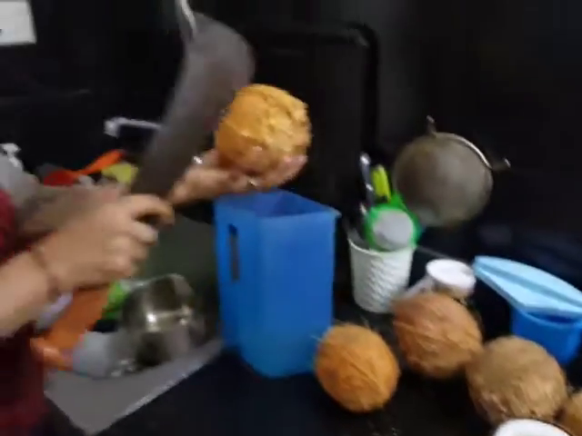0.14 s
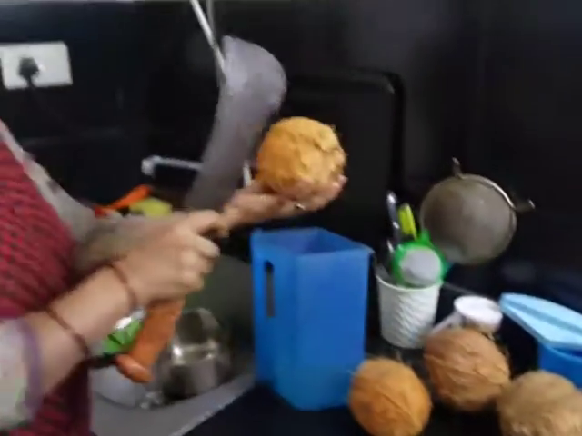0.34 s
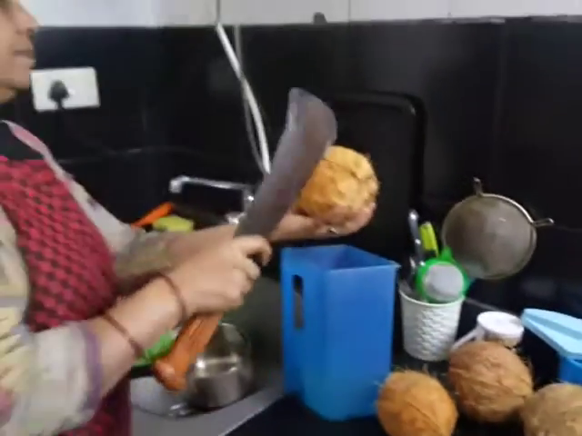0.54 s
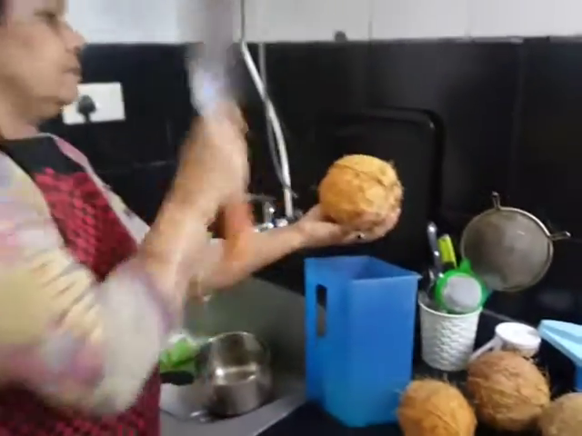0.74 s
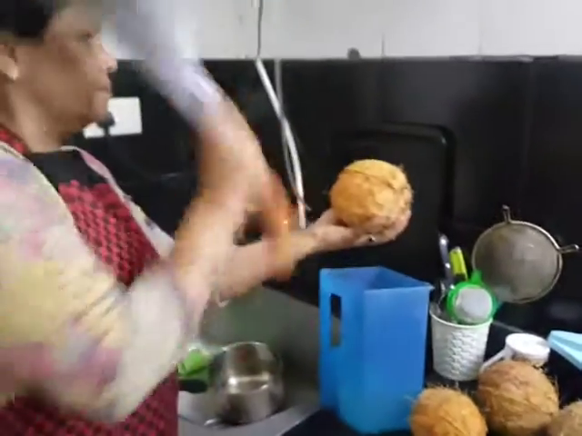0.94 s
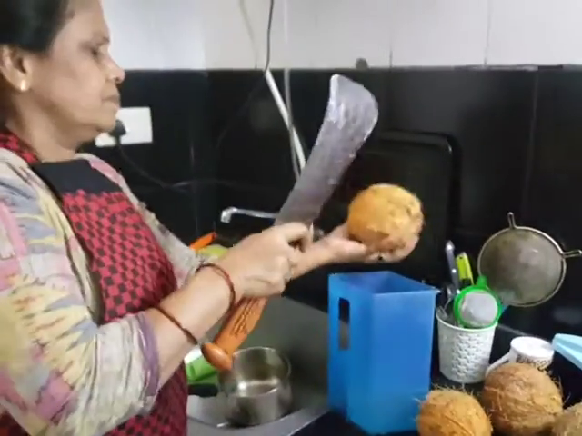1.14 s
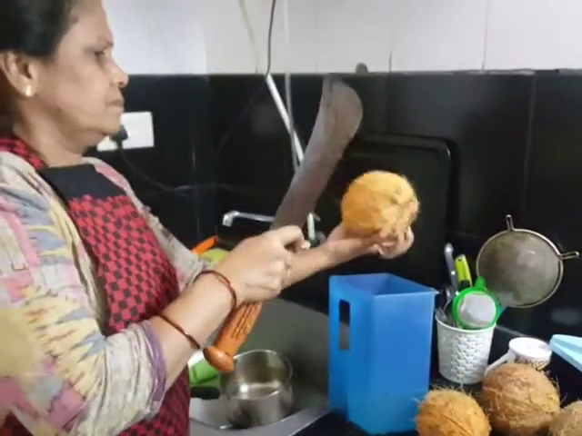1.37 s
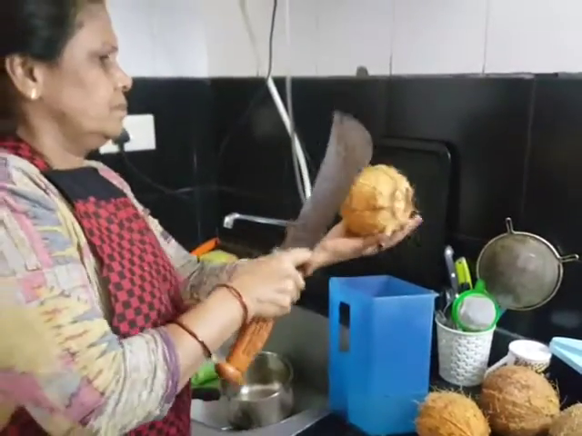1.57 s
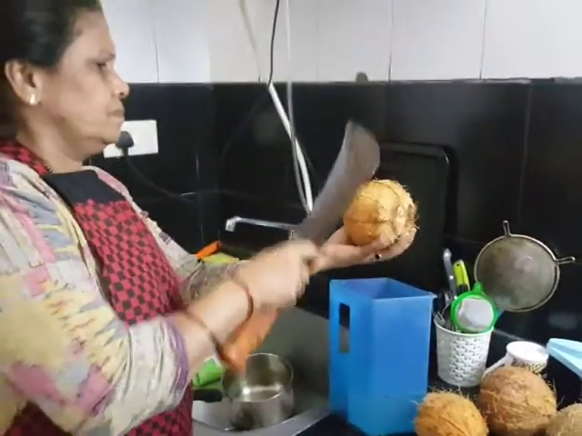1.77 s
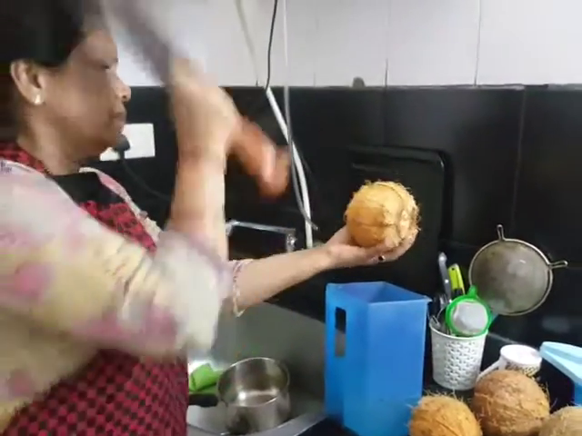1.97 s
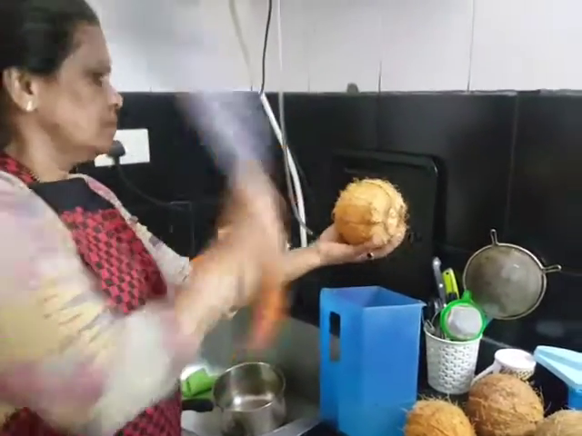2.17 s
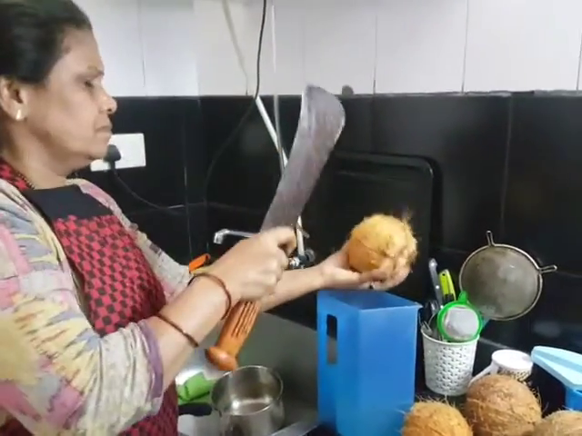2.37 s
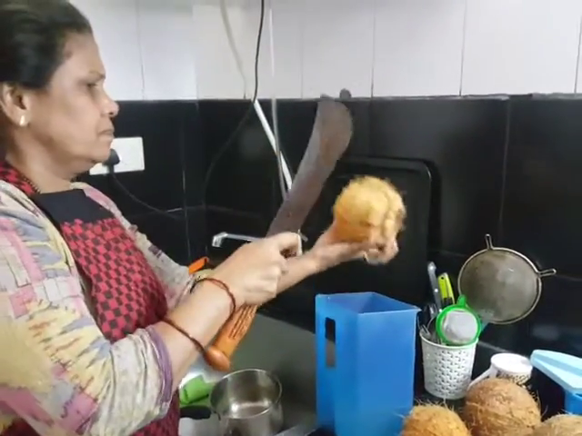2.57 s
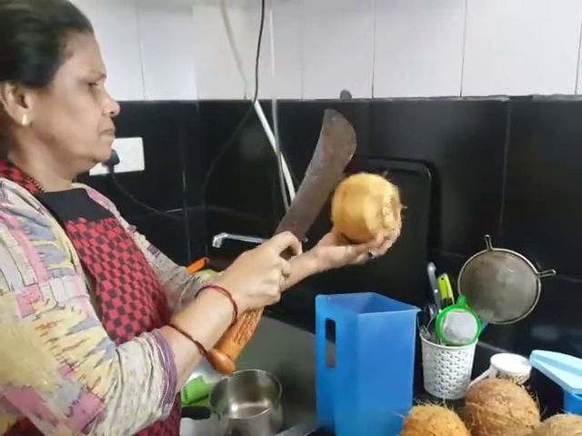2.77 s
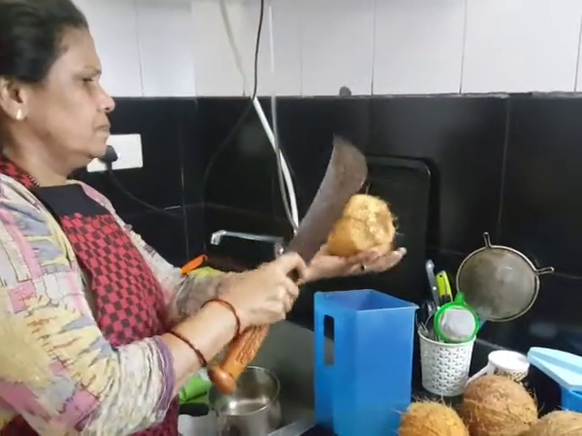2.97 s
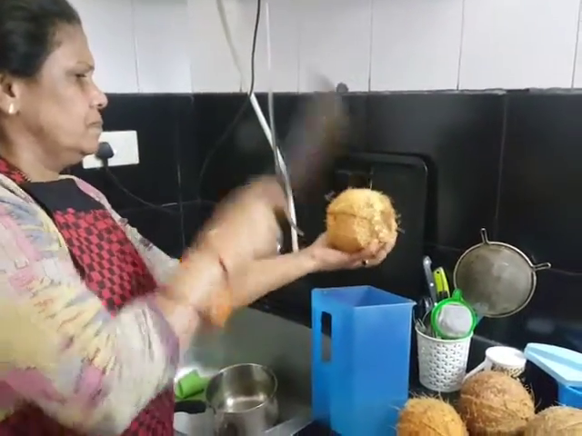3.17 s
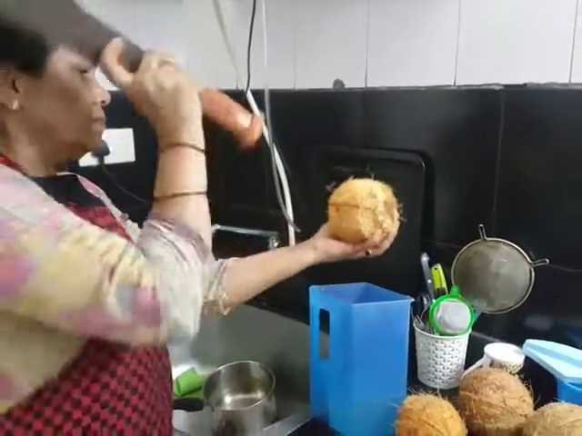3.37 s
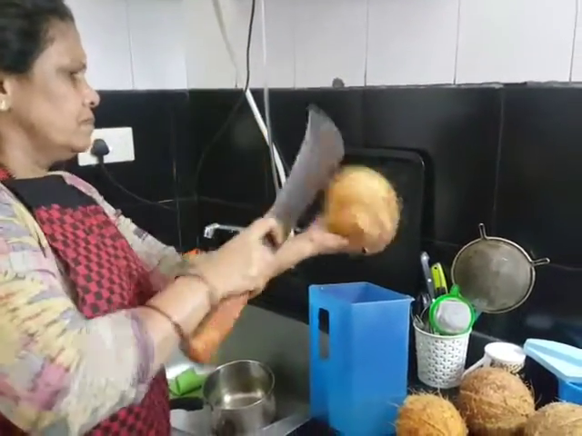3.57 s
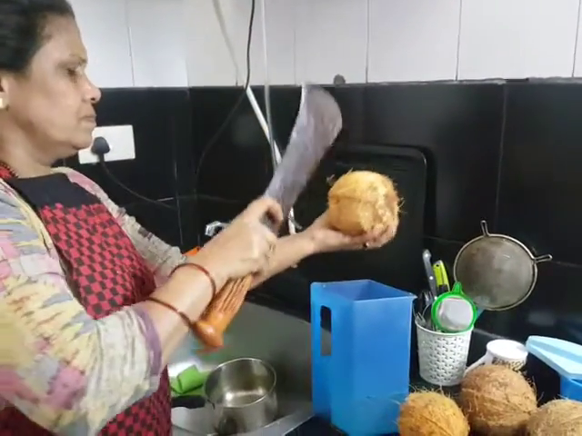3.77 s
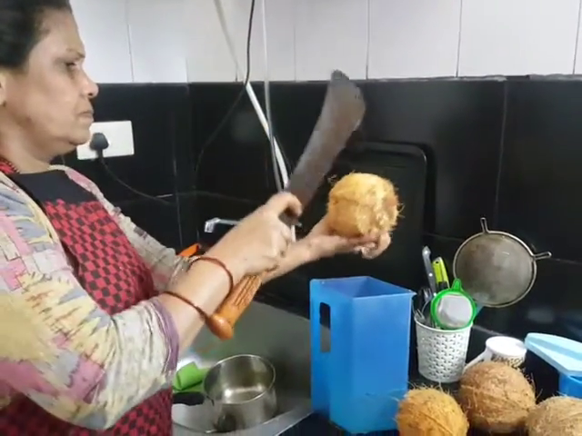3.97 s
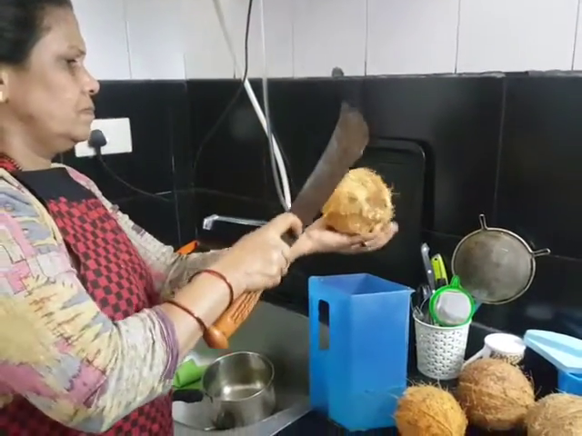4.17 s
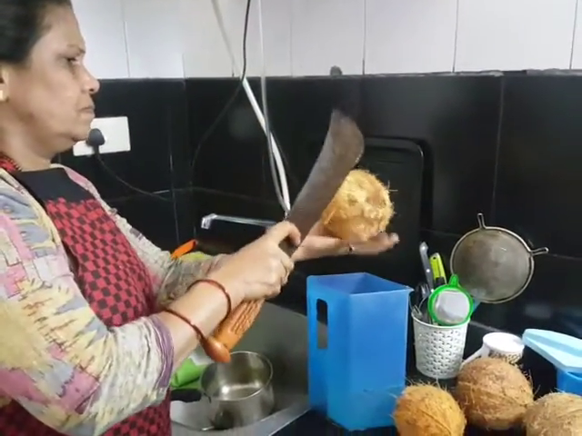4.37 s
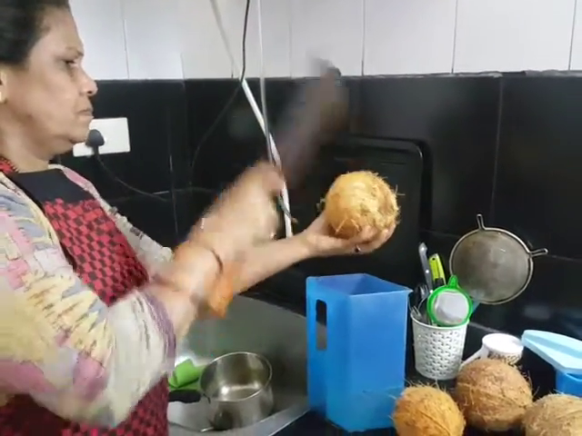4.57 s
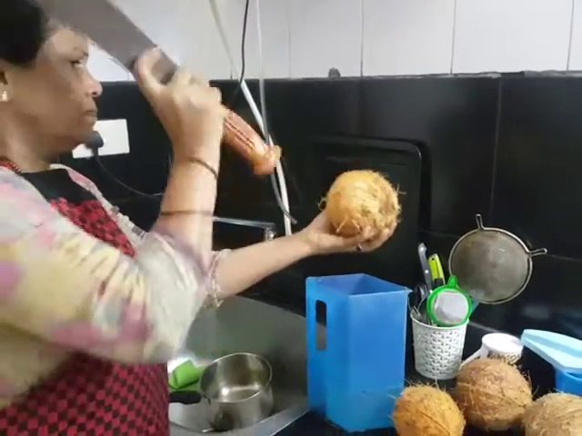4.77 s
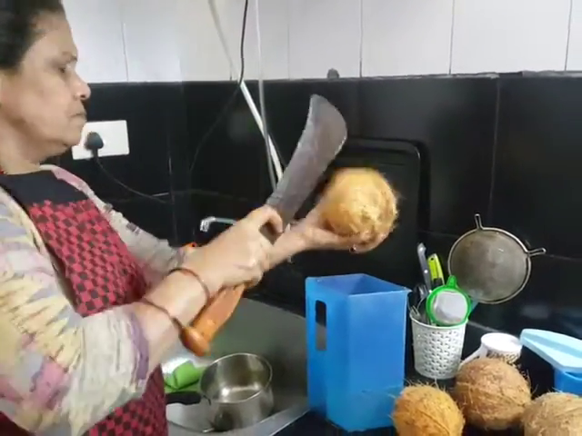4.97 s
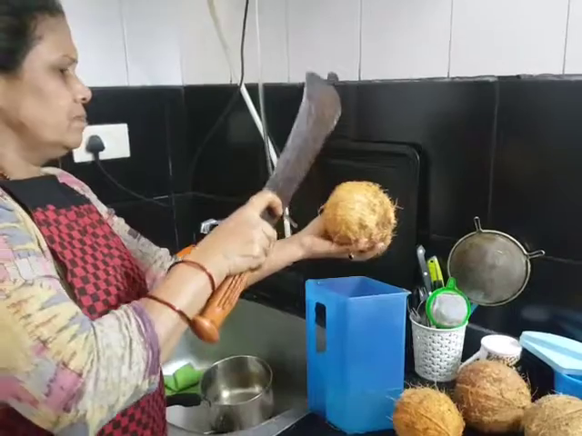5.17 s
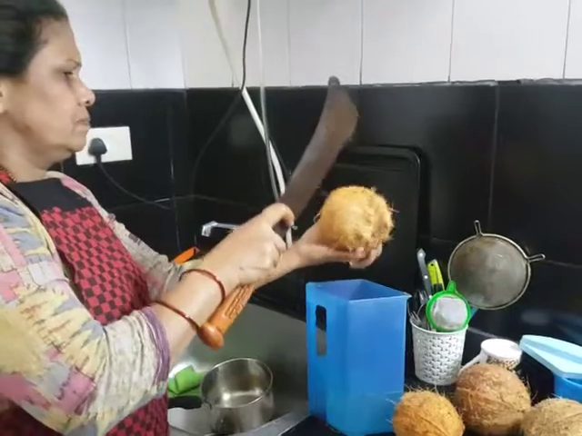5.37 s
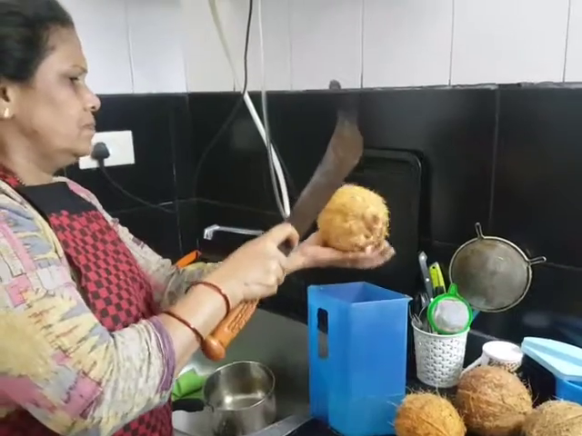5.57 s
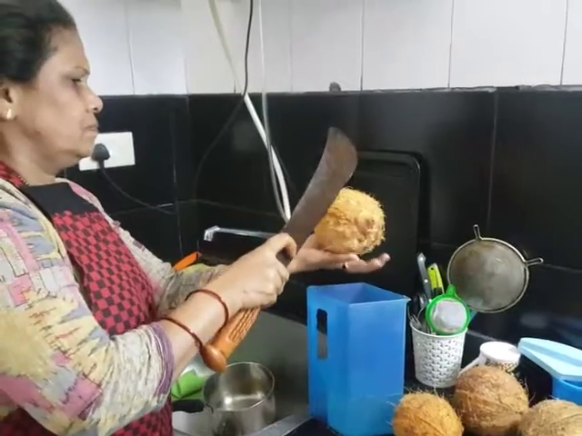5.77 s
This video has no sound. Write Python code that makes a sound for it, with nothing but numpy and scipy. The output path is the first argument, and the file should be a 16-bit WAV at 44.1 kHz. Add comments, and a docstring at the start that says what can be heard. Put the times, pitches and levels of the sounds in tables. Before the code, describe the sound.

Quiet room air and a low handling jolt open the scene, with sleeve rustle and a dull palm catch. Then come four loud blade knocks on a coconut, each followed by a short bright tiled echo and soft catches of the tossed nut. The shell rings first, then splits with dry cracks. A small metal bangle clinks before the third blow. Stereo handheld pickup, the room dipping after hard hits.

```python
"""A machete strikes a husked coconut held in one hand, four times, in a small tiled kitchen.
The shell modes ring at the first two blows; as it splits they give way to a broad, dry crack. The nut
is also tossed round and lands softly in the palm. Arm noise rushes before each blow, a bangle clinks,
a sleeve swishes and filtered noise makes room air, hum and handling. Two spaced microphones hear the
nut direct and through echoes; a slow gain control pulls the room down after hard blows."""
import sys
import numpy as np
from scipy import signal
from scipy.fft import rfft, irfft
from scipy.io import wavfile

SR = 44100
rng = np.random.default_rng(int(sys.argv[2]) if len(sys.argv) > 2 else 0)


def transcribe(signal):
    """Save signal, clipped to [-1, 1], as a 16-bit WAV file at the path in sys.argv[1]."""
    frames = np.atleast_2d(signal).T
    limited = np.clip(frames, -1, 1)
    pcm = np.round(limited * 32767).astype(np.int16)
    wavfile.write(sys.argv[1], SR, pcm)


N = 257544
TAPS = 8192  # size of the spectra that shape an impact; the impact itself is half as long [samples]


def gain_of(db):
    """Decibels to amplitude."""
    return 10 ** (np.asarray(db) / 20)


def evened(x):
    """Scales to rms 1."""
    return x / np.sqrt(np.mean(x ** 2) + 1e-20)


def read(points, hz):
    """Interpolates a table of (frequency, value) along a log-frequency axis."""
    f, value = np.transpose(points)
    return np.interp(np.log(hz + 1), np.log(f + 1), value)


def add(mix, s, sound):
    """Adds a stereo sound at time s, cut where the mix ends."""
    part = mix[:, round(s * SR):][:, :sound.shape[1]]
    part += sound[:, :part.shape[1]]


def peak(hz, centre_hz, width):
    """Power response of a resonance with steep skirts; width is taken at half power."""
    return 1 / (1 + ((hz - centre_hz) / (0.77 * width)) ** 2) ** 2


def swell(s, length):
    """A smooth bell-shaped rise and fall around time s; length is its standard deviation."""
    return np.exp(-((np.arange(N) / SR - s) / length) ** 2 / 2)


def diffuse(pair, null_hz=1250):
    """Sound from all sides at two spaced microphones: alike in the bass, unrelated in the treble."""
    a, b = rfft(pair)
    same = .98 * np.sinc(np.fft.rfftfreq(pair.shape[1], 1 / SR) / null_hz)
    mid = a * np.sqrt((1 + same) / 2)
    side = b * np.sqrt((1 - same) / 2)
    return irfft(np.array([mid + side, mid - side]), pair.shape[1])


def noise(tone):
    """Diffuse noise of rms 1 with the given spectrum."""
    spectrum = rfft(diffuse(rng.standard_normal((2, N))))
    return evened(irfft(spectrum * gain_of(read(tone, np.fft.rfftfreq(N, 1 / SR))), N))


def band(centre_hz, width):
    """A wavering tone of rms 1: diffuse noise in one resonance."""
    spectrum = rfft(diffuse(rng.standard_normal((2, N))))
    return evened(irfft(spectrum * np.sqrt(peak(np.fft.rfftfreq(N, 1 / SR), centre_hz, width)), N))


# Steady air of the kitchen, relative spectrum: (frequency [Hz], density [dB per Hz])
AIR_TONE = [(25, -13.5), (45, -12.5), (80, 2), (130, -5), (200, -0.5), (330, -10.5), (700, -11.5),
            (1500, -11.5), (2800, -15.5), (5000, -22.5), (9300, -29), (10500, -37.5), (16000, -32.5)]


def air(level_db=-57):
    """Steady room air: broadband noise reaching the microphones from all sides."""
    return gain_of(level_db) * noise(AIR_TONE)


# A low drone and a thin whine: (frequency [Hz], width [Hz], level [dB])
HUM_TONES = [(246, 9.7, -76), (14930, 60, -72.5), (15130, 30, -74.5)]


def hum():
    """Faint steady tones that waver because each is a narrow band of noise."""
    return sum(gain_of(db) * band(f, width) for f, width, db in HUM_TONES)


# Sleeve cloth, relative spectrum: (frequency [Hz], density [dB per Hz])
SLEEVE_TONE = [(100, -10.5), (200, 3.5), (260, 3.5), (550, -7), (900, -9), (1900, -15), (4500, -27.5),
               (9000, -34), (11000, -40)]
# The nut is settled and the arm first lifts: (time [s], standard deviation [s], level [dB])
SLEEVE_SWISHES = [(-0.005, .12, -47), (0.29, .1, -50.5), (0.791, 0.062, -49.5), (0.997, .08, -53)]


def sleeve():
    """Cloth rustles: soft noise that rises and falls with each movement."""
    return noise(SLEEVE_TONE) * sum(gain_of(db) * swell(s, length) for s, length, db in SLEEVE_SWISHES)


# Hand on the camera, relative spectrum: (frequency [Hz], density [dB per Hz])
HANDLING_TONE = [(20, -8.5), (45, -8.5), (72, 3.5), (100, -6.5), (150, -14), (400, -59.5)]


def handling(grip_s=0.13, rise_s=.02, fade_s=0.048, grip_db=-44, settle_db=-52, settle_db_per_s=10.5):
    """A low jolt as the grip on the camera shifts, over a rumble that dies as the hand settles."""
    t = np.arange(N) / SR
    age = np.maximum(t - grip_s, 0)
    jolt = np.minimum(age / rise_s, 1) * np.exp(-age / fade_s)
    rumble = gain_of(settle_db - settle_db_per_s * t)
    return noise(HANDLING_TONE) * (gain_of(grip_db) * jolt + rumble)


# Faint background swells: (time [s], standard deviation [s], frequency [Hz], width [Hz], level [dB])
FAINT_SWELLS = [(0.047, 0.11, 1860, 240, -53.5), (0.28, 0.12, 545, 26, -53.5), (1.02, 0.21, 520, 50, -53.5),
                (0.065, 0.021, 4400, 4800, -53.5)]


def faint_swells():
    """Bands of noise, most of them narrow, that briefly rise out of the background."""
    return sum(gain_of(db) * swell(s, length) * band(f, width) for s, length, f, width, db in FAINT_SWELLS)


def background():
    """All that is heard around the nut and the arm's blows."""
    return air() + hum() + sleeve() + handling() + faint_swells()


# Standing waves of the kitchen, one a long faint ring: (frequency [Hz], relative level [dB], t60 [s])
ROOM_MODES = [(89, -15, 0.69), (107, -9.5, .6), (175.2, -1.5, 0.87), (199.6, -2, 0.69), (245, 3, 0.58),
              (248.6, -14, 1.6), (265, -8.5, 0.54), (297.4, 0, 0.4), (347.4, -6, 0.97), (500, -5, 0.21),
              (645, -3, 0.38), (731, -8.5, 1)]


def standing(t):
    """Low room modes; the shorter the wave, the more its phase differs between the microphones."""
    sides = np.array([[.5], [-.5]])
    out = np.zeros((2, len(t)))
    for k, (f, db, t60) in enumerate(ROOM_MODES):
        apart = (-1) ** k * min((f / 330) ** 2.5, 1.3)  # phase between the microphones [rad]
        out += gain_of(db - 60 * t / t60) * np.cos(2 * np.pi * f * t + sides * apart)
    return out


# How long the tiles hold the sound: (frequency [Hz], t60 [s])
TAIL_DECAY = [(80, 0.65), (250, 0.9637), (700, 0.68), (1400, 0.6243), (2800, 0.6818), (5400, 0.5768),
              (8500, 0.5181), (11000, 0.44), (15000, 0.27)]
# Colour of the tiled tail: (frequency [Hz], relative level [dB])
TAIL_COLOUR = [(80, -1), (250, -8), (450, 2), (1000, -2), (15000, -2.5)]


def kitchen(dry_db, direct_db=-15, near_db=-6, near_s=.006, build_s=0.0054, standing_db=-56, settle_s=0.01):
    """Response from the nut to the microphones: direct path, counter and wall, tiled tail, standing waves."""
    t = np.arange(SR) / SR
    density = np.minimum(.2 + 6 * t, 1)  # echoes thicken with time
    echoes = rng.standard_normal((2, SR)) * (rng.random((2, SR)) < density)
    echoes = diffuse(echoes) / np.sqrt(density)
    hz, age, z = signal.stft(echoes, SR, nperseg=256)
    z = z * gain_of(read(TAIL_COLOUR, hz)[:, None] - 60 * age / read(TAIL_DECAY, hz)[:, None])
    tail = signal.istft(z, SR, nperseg=256)[1][:, :SR]
    tail = tail * (1 - np.exp(-t / build_s)) / np.sqrt(SR * 0.038)
    near = diffuse(rng.standard_normal((2, SR)), null_hz=2820) * t * np.exp(-2 * t / near_s)
    early = gain_of(near_db) * evened(near) / np.sqrt(SR)
    early[[0, 1], [14, 12]] += gain_of(direct_db)  # direct sound: two samples sooner at the second microphone
    modes = gain_of(standing_db) * standing(t) * (1 - np.exp(-t / settle_s))
    return gain_of(dry_db) * early + tail + modes


def causal(gain):
    """The sharpest click that has this magnitude spectrum (minimum phase)."""
    log_gain = np.log(np.maximum(gain, 1e-5))
    phase = -signal.hilbert(np.r_[log_gain, log_gain[-2:0:-1]]).imag[:len(gain)]
    return irfft(np.exp(log_gain + 1j * phase))[:TAPS // 2]


# Shell resonances: (frequency [Hz], width [Hz], relative level struck at place 0 [dB], at place 1 [dB])
SHELL_MODES = [(1625, 75, 8.5, -2.5), (1796, 120, -6.5, 3), (2170, 190, -4, -17), (2860, 160, -3, -6.5),
               (3060, 190, -12, 2), (3560, 230, -5.5, -11), (4700, 550, -15.5, -11.5),
               (8500, 1300, -3.5, -28)]
# Dull push of nut and hand: (frequency [Hz], relative level [dB])
THUD_TONE = [(30, -42.5), (70, -13), (100, -8), (135, -16), (180, 1.5), (250, 0.5), (400, -5.5),
             (650, -3.5), (810, -4), (980, -8.5), (1300, -22), (3000, -43)]
# Dry crack of a split shell: (frequency [Hz], relative level [dB])
CRACK_TONE = [(30, -50), (100, -26), (330, -15), (450, -8), (620, -11), (840, -2), (1050, -3), (1280, -1),
              (1800, -0.5), (2300, 2), (3000, -3.5), (4000, -6.5), (5000, -10), (6200, -22.5), (12000, -40)]
# Tick of the contact: (frequency [Hz], relative level [dB])
TICK_TONE = [(100, -41), (1200, -18), (2500, -11.5), (4800, -13), (6200, -13.5), (8300, -12), (9300, -12.5),
             (10500, -22), (13000, -20), (14500, -22.5), (16000, -37.5)]


def knock(thud_db, boom_db, ring_db, crack_db, tick_db, hard_hz, place, hollow_hz=258, hollow_width=65):
    """One impact: thud, boom of the hollow nut, the shell modes that this place excites, crack and tick."""
    hz = np.fft.rfftfreq(TAPS, 1 / SR)
    place = np.clip(place, 0, 1)
    ring = sum(gain_of(ring_db + a + place * (b - a)) ** 2 * peak(hz, f, width)
               for f, width, a, b in SHELL_MODES)
    ring /= 1 + (hz / hard_hz) ** 6  # a soft palm cannot ring the high modes
    boom = gain_of(boom_db) ** 2 * peak(hz, hollow_hz, hollow_width)
    boom *= np.minimum(hz / hollow_hz, 1) ** 2  # it radiates little bass
    layers = [(thud_db, THUD_TONE), (crack_db, CRACK_TONE), (tick_db, TICK_TONE)]
    broad = sum(gain_of(db + read(tone, hz)) ** 2 for db, tone in layers)
    return causal(np.sqrt(ring + boom + broad))


# Tossed nut meets the palm, levels relative: (time [s], thud [dB], hollow boom [dB], shell ring [dB])
PALM_LANDINGS = [(0.4853, -15, -15, -18), (1.6661, -25, -19.5, -26), (3.0331, -24.5, -18, -28.5),
                 (4.2990, -40.5, -31.5, -57), (5.752, -39, -24, -59)]


def landings(place=.6, crack_db=-20, tick_db=-18, direct_db=4.5, hard_hz=1850):
    """The palm catches the nut: the same body, softly struck; crack and tick are set against the thud."""
    out = np.zeros((2, N))
    for s, thud_db, boom_db, ring_db in PALM_LANDINGS:
        impact = knock(thud_db, boom_db, ring_db, thud_db + crack_db, thud_db + tick_db, hard_hz, place)
        add(out, s, signal.fftconvolve(impact[None], kitchen(direct_db), axes=1))
    return out


# Rush of air and cloth, relative spectrum: (frequency [Hz], density [dB per Hz])
SWING_TONE = [(150, -6), (600, -7), (1100, -1.5), (1900, 2.5), (3000, -7), (4500, -9.5), (9000, -25),
              (11000, -35.5)]


def swings(lead_s=.1, length_s=.13):
    """Air and cloth rush as the blade comes down; the noise peaks shortly before each blow."""
    rush = sum(gain_of(swing_db) * swell(s - lead_s, length_s) for s, *_, swing_db in BLADE_BLOWS)
    return noise(SWING_TONE) * rush


# Blows of the blade, levels relative except the swing: (time [s], force [dB], split of the shell [0-1],
# place round the nut [0-1], hollow boom [dB], direct and near sound [dB], swing level [dB])
BLADE_BLOWS = [(1.1113, -1.5, .05, .02, -0.5, -2, -78), (2.3090, 0.03, 0, 0.8, 3, -2.5, -64.5),
               (3.6392, 0.44, 0.52, .8, -3.5, -0.1, -67), (5.017, 2, 0.49, .47, 6, 1, -53.5)]
# What a blow draws from the shell, relative: (thud [dB], shell ring [dB], crack [dB], tick [dB])
WHOLE, SPLIT = (5, 4, -6, 1.5), (-9, -5, 9.5, 3.5)


def blows(hard_hz=8700):
    """As the shell splits, thud and ring give way to a dry crack; each blow has its own echoes."""
    out = np.zeros((2, N))
    for s, force_db, split, place, boom_db, dry_db, _ in BLADE_BLOWS:
        drawn_db = np.array(WHOLE) + np.clip(split, 0, 1) * np.subtract(SPLIT, WHOLE)
        thud_db, ring_db, crack_db, tick_db = force_db + drawn_db
        impact = knock(thud_db, boom_db, ring_db, crack_db, tick_db, hard_hz, place)
        add(out, s, signal.fftconvolve(impact[None], kitchen(dry_db), axes=1))
    return out


def coconut(loud_db=30):
    """The nut is tossed round, caught and struck."""
    return gain_of(loud_db) * (landings() + blows())


# Modes of the bangle: (frequency [Hz], width [Hz], relative level [dB])
BANGLE_MODES = [(3280, 260, 3.5), (3800, 1100, -6.5), (5100, 150, 1.5), (9200, 290, -4.5)]


def bangle(s=3.207, loud_db=-10):
    """A small metal clink as the arm lifts: a few resonances struck at once, echoed by the kitchen."""
    hz = np.fft.rfftfreq(TAPS, 1 / SR)
    out = np.zeros((2, N))
    clink = causal(np.sqrt(sum(gain_of(db) ** 2 * peak(hz, f, width) for f, width, db in BANGLE_MODES)))
    add(out, s, signal.fftconvolve(clink[None], kitchen(dry_db=4), axes=1))
    return gain_of(loud_db) * out


def scene():
    """The whole kitchen."""
    return background() + coconut() + swings() + bangle()


def lag(x, seconds):
    """Follows x with the given time constant."""
    keep = np.exp(-1 / (seconds * SR))
    return signal.lfilter([1 - keep], [1, -keep], x)


# How the two microphones differ: (frequency [Hz], left minus right [dB])
MIC_BALANCE = [(500, 0), (1000, -0.35), (2000, -0.2), (4500, -2), (8000, 1.1), (12000, 0)]


def record(dry, threshold_db=-17.5, squeeze=10.4, fall_s=0.099, recover_s=0.68, edge_hz=16050):
    """Unequal microphones, a slow gain control that ducks after hard blows, rounded peaks, treble limit."""
    lean_db = read(MIC_BALANCE, np.fft.rfftfreq(N, 1 / SR)) / 2
    heard = irfft(rfft(dry) * gain_of([lean_db, -lean_db]), N)
    # the detector ignores the bass
    bright = signal.sosfilt(signal.butter(2, 800, "high", fs=SR, output="sos"), heard)
    power = lag(np.mean(bright ** 2, axis=0), 0.009)
    over_db = np.maximum(10 * np.log10(power + 1e-12) - threshold_db, 0)
    duck_db = squeeze * lag(lag(over_db, fall_s), recover_s)  # two lags in series: a late dip, a slow return
    rounded = np.tanh(heard / gain_of(duck_db))
    lowpass = signal.firwin(511, edge_hz, window=("kaiser", 9), fs=SR)
    return signal.oaconvolve(rounded, lowpass[None], "same")


dry = scene()
out = record(dry)
transcribe(out)
```